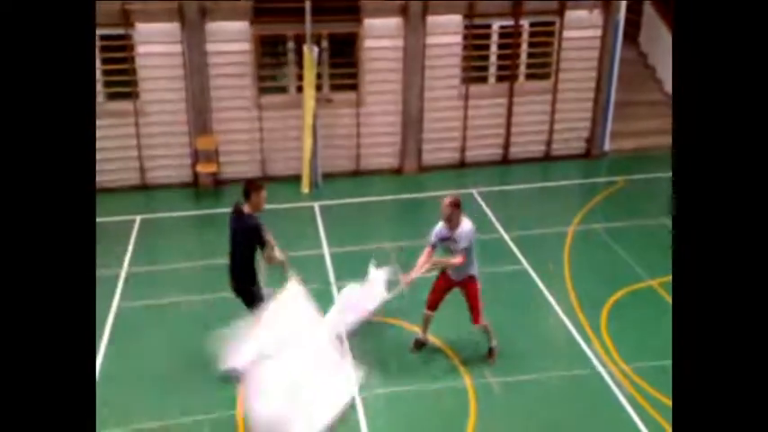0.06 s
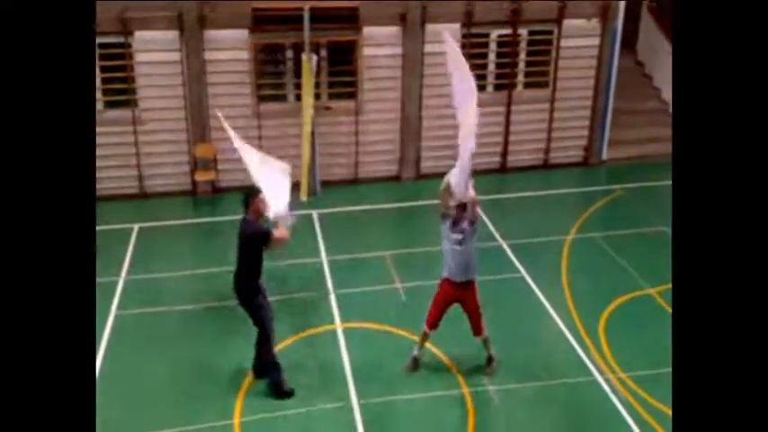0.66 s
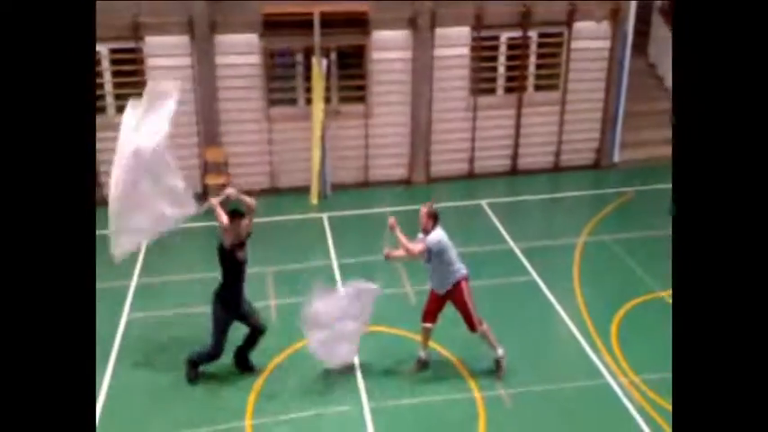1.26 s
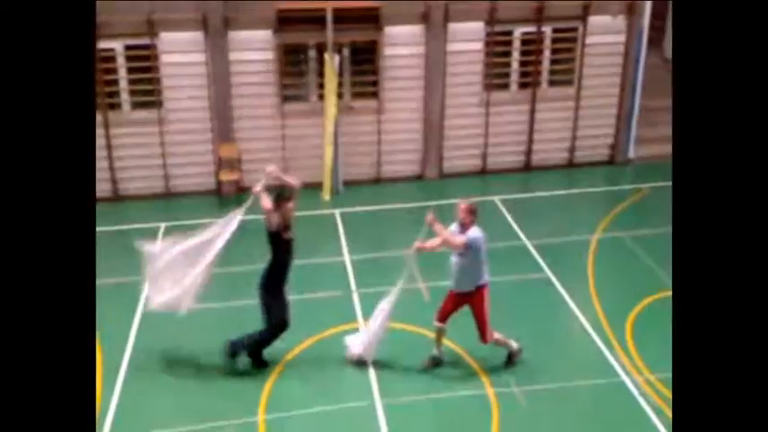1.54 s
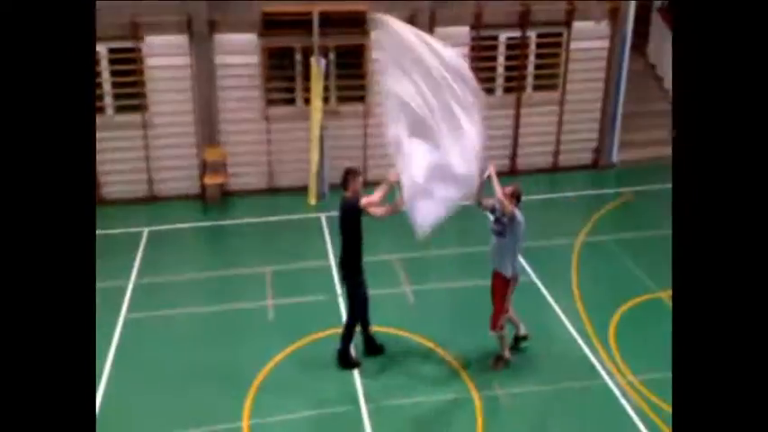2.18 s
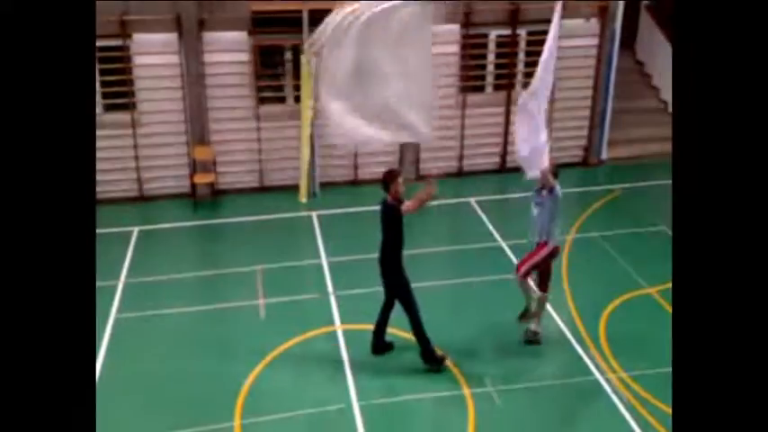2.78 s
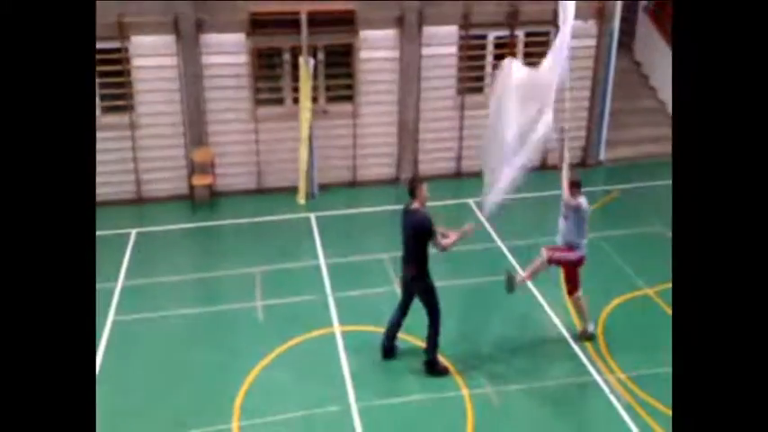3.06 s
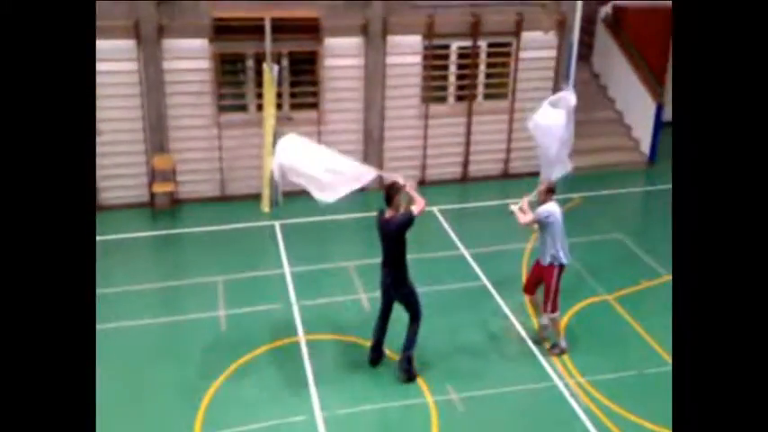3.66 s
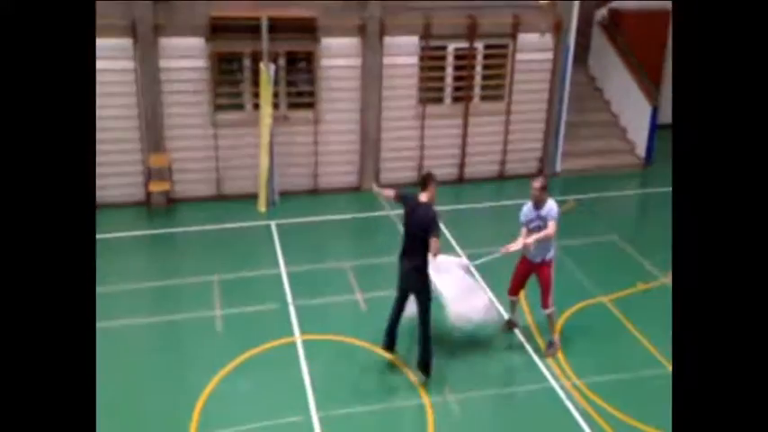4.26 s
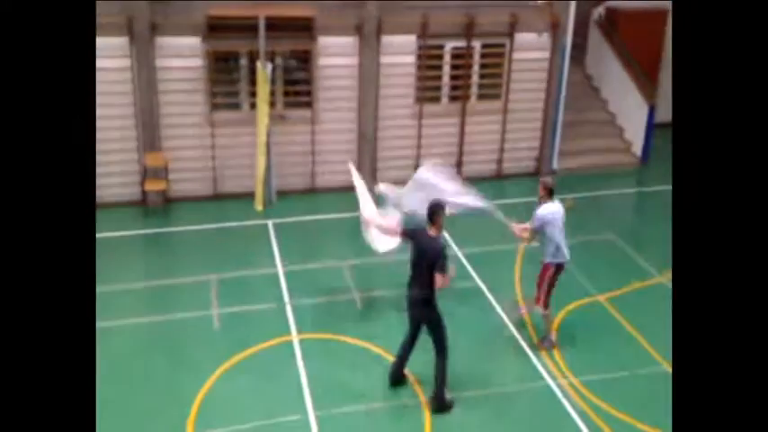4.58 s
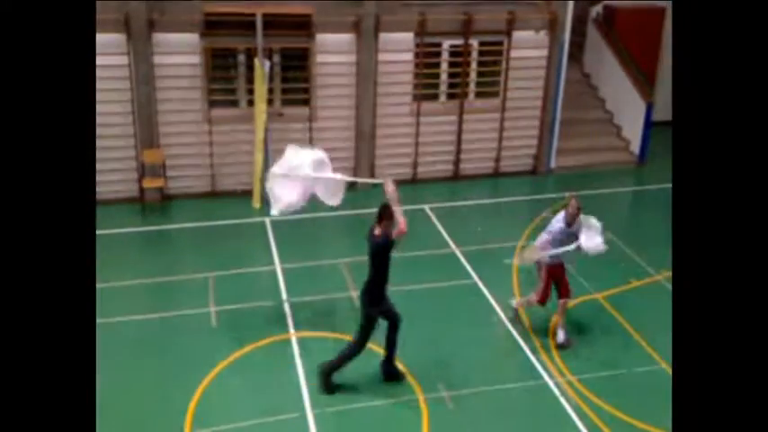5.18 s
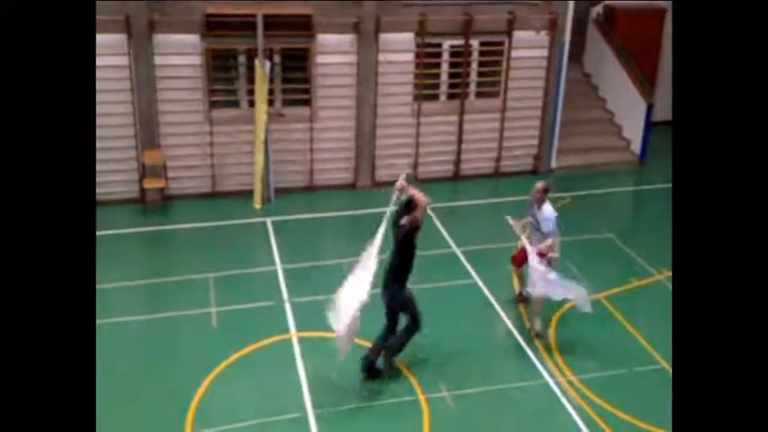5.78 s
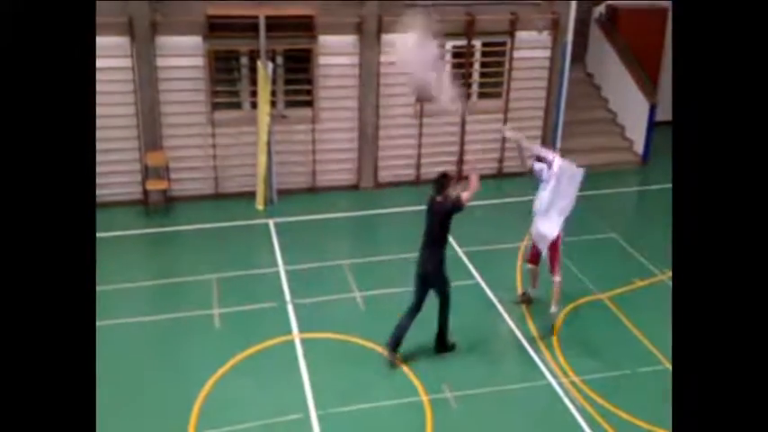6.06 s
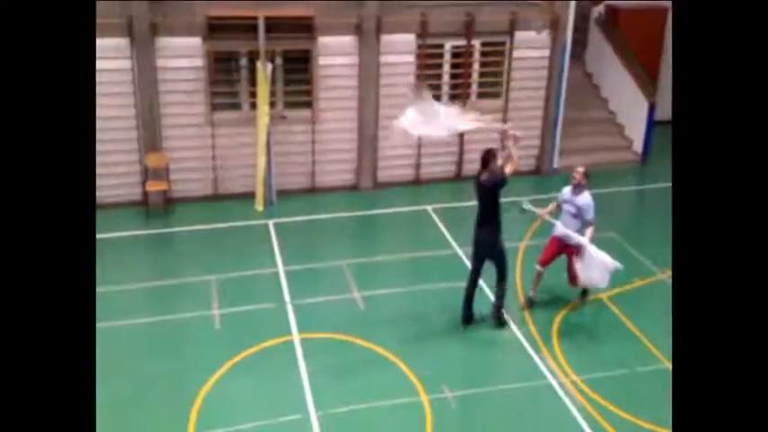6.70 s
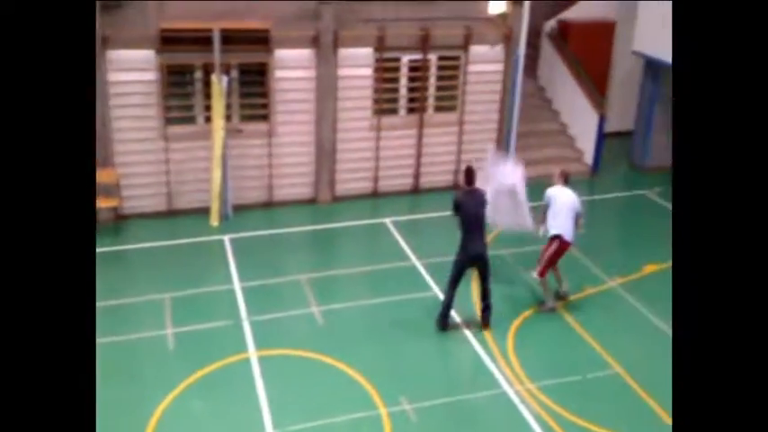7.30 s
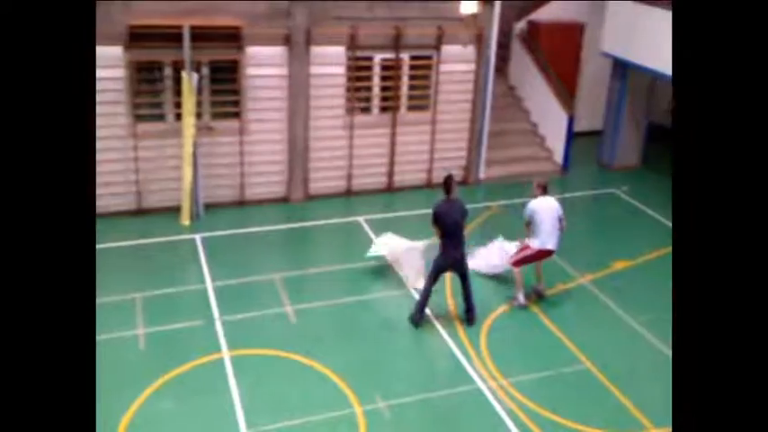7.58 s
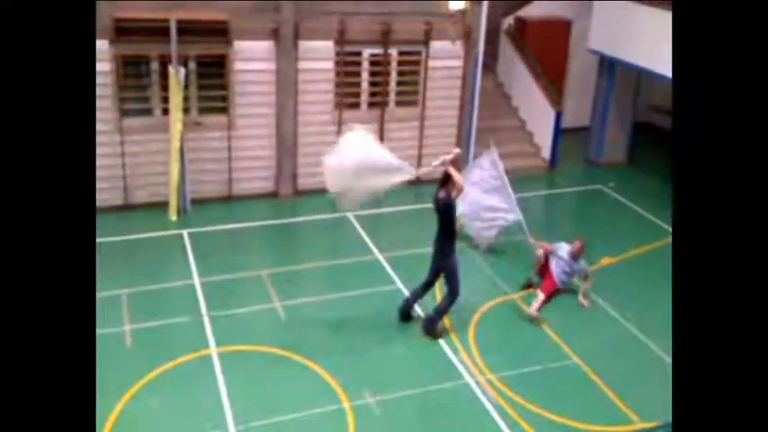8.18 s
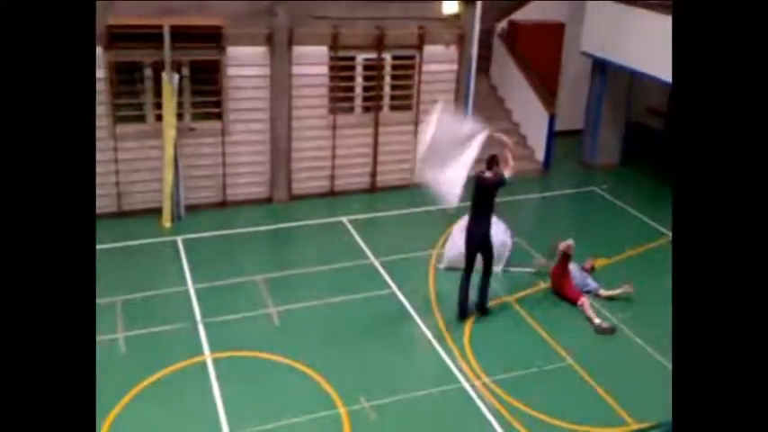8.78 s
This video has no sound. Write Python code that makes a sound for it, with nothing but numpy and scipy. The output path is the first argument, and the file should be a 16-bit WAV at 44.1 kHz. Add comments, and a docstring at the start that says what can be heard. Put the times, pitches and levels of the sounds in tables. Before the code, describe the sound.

Large cloth flags are swung in a sports hall, heard from a gallery, every snap echoing for up to two seconds over low air noise and faint hiss. A loud opening flurry of fluttering and flapping brings the sharpest whip-like crack at 0.3 seconds. Another swish comes at 1.2, then a dry, dull knock close to the microphone at 1.8. Strong flaps and a crack follow from 2 to 2.3, with lighter swishes and snaps around 3, 3.5 and 4.3. From about 4.8 to 6.1 there is a lull, holding a few soft pats of rubber soles and a faint close knock. At 6.2 a loud rustling swing with flaps and a crack breaks in. More swings and snaps come around 6.7, 7.3 and 8, then ease off, ending with a small snap and flutter near 9 seconds.

```python
"""In a sports hall, heard from a gallery, two people swing large cloth flags on poles.
Air flowing over the cloth makes it flutter and rustle; folds fill in dull flaps, and the free edge
cracks like a whip. A few dull knocks sound close by, and rubber soles pat the floor during a lull.
Floor and walls reflect each snap, and the hall reverberates for nearly two seconds, darkening as it
decays. Low air noise and a faint hiss lie underneath."""
import sys
import numpy as np
from scipy import signal
from scipy.fft import rfft, irfft
from scipy.io import wavfile
from scipy.ndimage import uniform_filter1d

SR = 44100
rng = np.random.default_rng(int(sys.argv[2]) if len(sys.argv) > 2 else 0)


def dump_mix(stems):
    """Bounce the given channels to the path in sys.argv[1] as a 16-bit WAV at rate SR."""
    frames = np.atleast_2d(stems).T  # one column per channel
    limited = np.clip(frames, -1, 1)  # hard clip at full scale
    pcm = np.round(limited * 32767).astype(np.int16)
    wavfile.write(sys.argv[1], SR, pcm)


N = 398771

# spectrum of the hall's air noise: (frequency [Hz], relative level [dB])
AIR_SPECTRUM = [(25, 3.5), (60, -2), (130, 2.5), (200, -8), (350, -1.5), (700, -8.5), (1200, -26.5),
                (3400, -28.5), (8000, -35), (15000, -37.5)]
# envelope of the faint hiss: (time [s], level [dB])
HISS_ENVELOPE = [(0, -57), (1.1, -69), (2.8, -76), (5.249, -90.5), (5.501, -77), (6.5, -62.5), (8.9, -76)]
# swings of a flag: (time at full speed [s], hold [s], flutter level [dB], final rustle level [dB])
SWINGS = [ (0.11, .17, -20.5, -40), (0.313, 0.041, -12.5, -8.5), (0.48, .1, -13, -22),
          (1.235, 0.12, -21, -39), (2.08, 0.171, -18, -19), (2.68, 0.41, -36.5, -52),
          (3.46, .08, -23.5, -37), (3.62, .21, -27.5, -52), (4.3, 0.12, -29.5, -33.5),
          (4.54, 0.16, -40.5, -62.5), (5.46, 0.057, -62, -57.5), (5.98, 0.21, -58.5, -58.5),
          (6.32, .12, -10, -10), (6.69, 0.17, -19.5, -40), (6.96, .17, -26.5, -49),
          (7.294, 0.028, -11.5, -20.5), (7.59, 0.12, -26, -40), (7.92, 0.171, -17.5, -22),
          (8.15, 0.14, -21.5, -35.5), (8.68, 0.062, -46, -46), (9.03, 0.028, -26, -51)]
# spectrum of fluttering cloth: (frequency [Hz], relative level [dB])
FLUTTER_SPECTRUM = [(25, -27.5), (60, -16), (130, -6.5), (180, -6), (290, 0.5), (600, 1.5), (850, 4.5),
                    (1000, -2.5), (1400, 0), (2100, -5.5), (3100, -16), (5000, -28), (8000, -43.5),
                    (15000, -57)]
# spectrum of rustling creases: (frequency [Hz], relative level [dB])
RUSTLE_SPECTRUM = [(300, -13), (1000, -4.5), (2200, 13), (4000, 2), (6500, -3), (8500, -8.5), (10500, -12),
                   (13000, -19.5), (15500, -23.5)]
# the loudest folds filling with air: (time [s], level [dB])
FLAPS = [ (0.054, -28), (0.2505, -7.5), (0.4934, -10), (1.154, -27.5), (1.181, -25), (1.26, -23.5),
         (2.003, -30), (2.061, -15), (2.094, -14.5), (2.273, -15.5), (3.367, -31.5), (3.4766, -17),
         (3.5155, -24), (6.234, -18), (6.266, -11), (6.301, -14), (6.341, -11.5), (6.69, -11),
         (7.0985, -13), (8.076, -11), (8.411, -23.5)]
# the loudest whip cracks: (time [s], level [dB], tilt [dB/octave], gain toward the listener [dB])
CRACKS = [ (0.2465, -26.5, -15, 16), (0.3119, -3, 0, 1.5), (0.339, -15.5, 9, -1.5), (0.492, -22, 2, 4.5),
          (1.26, -20, -11.5, 3), (1.409, -37, -9, 6.5), (2.0504, -33.5, -1.5, 2), (2.178, -12, -0.5, 0.5),
          (2.9555, -17, -16, 1.5), (2.977, -32.5, -13, 6.5), (3.4378, -35.5, -0.5, 1.5),
          (3.487, -35.5, 3, 0), (4.3545, -26, -4.5, 2), (6.4065, -13, -3, 3), (6.828, -43.5, 6, 2),
          (7.228, -14, -1, -4), (7.251, -23.5, -0.5, 6.5), (7.5866, -27.5, -4, -1.5),
          (7.86, -32.5, -3.5, -8), (7.987, -20.5, -12, 2.5), (8.076, -30, 8.5, 1),
          (8.9763, -28.5, -3.5, 1.5)]
# spectrum of a whip crack: (frequency [Hz], relative level [dB])
CRACK_SPECTRUM = [(100, -23), (500, -12.5), (1500, 2.5), (2500, 7), (4000, 5.5), (6500, 3.5), (8500, -3),
                  (10500, -11.5), (12500, -10), (14000, -14), (15500, -24.5)]
# dull knocks close by: (time [s], peak level [dB], frequency [Hz])
KNOCKS = [(1.814, -12, 450), (1.817, -21, 262), (5.719, -33.5, 279)]
# shoes landing on the floor: (time [s], level [dB])
FOOTSTEPS = [(5.205, -81), (5.26, -65.5), (5.52, -51), (5.895, -45), (6.048, -43.5), (6.145, -32.5)]
# spectrum of a sole's impact: (frequency [Hz], relative level [dB])
SOLE_SPECTRUM = [(60, -15.5), (150, -10.5), (350, -2), (600, 2), (900, -8), (1500, -15), (2500, -25.5),
                 (6000, -40), (15000, -65)]
# early reflections off floor and walls: (delay [s], level against the direct sound [dB])
REFLECTIONS = [(.0022, -30), (0.014, -23.5), (0.024, -12), (0.0278, -9.5), (0.04, -7)]
# reverberation time of the hall: (frequency [Hz], time to decay by 60 dB [s])
HALL_T60 = [(100, 2.9), (260, 2.03), (700, 1.407), (1840, 1.233), (3200, 1.14), (4850, 0.9), (8000, 0.5),
            (12800, 0.36)]

ATTACK_S, RELEASE_S = 0.042, 0.03  # the flag gathers speed, then falls slack
RUSTLE_RISE_DB = 19.5  # the rustle grows through a swing as the cloth pulls taut
FLAP_HZ = 897
SMALL_FLAPS_PER_S, SMALL_FLAP_DB = 22, -8  # level against the swing's flutter
TICKS_PER_S, TICK_DB = 16, -21  # level against the swing's flutter
TICK_TILT_DB, TICK_AIM_DB = -5, 6  # per octave; gain toward the listener
DIRECT_DB, HALL_DB, HALL_BUILD_S = -10, -5, 0.01955


def undb(db):
    """Amplitude grows tenfold for every 20 dB."""
    return 10 ** (np.asarray(db) / 20)


def unit(x):
    """Normalisation to an rms of one."""
    return x / np.sqrt(np.mean(x ** 2))


def along(points, hz):
    """Interpolation of (frequency [Hz], value) points on a logarithmic frequency axis."""
    f, value = np.transpose(points)
    return np.interp(np.log(np.maximum(hz, 1)), np.log(f), value)


def colour(x, spectrum, tilt_db=0, size=2048):
    """Minimum-phase filtering by a spectrum, tilted per octave about 3 kHz from 800 Hz upward."""
    hz = np.maximum(np.fft.rfftfreq(size, 1 / SR), 20)
    octaves = np.log2(np.maximum(hz, 800) / 3000)
    cepstrum = irfft(np.log(undb(along(spectrum, hz) + tilt_db * octaves)))
    cepstrum[1:size // 2] *= 2  # folding the cepstrum makes the filter causal
    cepstrum[size // 2 + 1:] = 0
    return signal.fftconvolve(x, irfft(np.exp(rfft(cepstrum))))[:len(x)]


def add(track, s, sound):
    """Superposition: a sound adds to the track from time s."""
    i = int(np.clip(s * SR, 0, N - 1))
    track[i:i + len(sound)] += sound[:N - i]


def burst(x, db):
    """Equal energy: a transient is scaled to match 25 ms of steady sound at this level."""
    return x * undb(db) * np.sqrt(.025 * SR / np.sum(x ** 2))


def pop(hz, cycles, size=2048):
    """A heavily damped pressure oscillation whose envelope peaks after the given cycles."""
    turns = hz * np.arange(size) / SR
    return np.sin(2 * np.pi * turns) * turns / cycles * np.exp(1 - turns / cycles)


def background(air_db=-65.5):
    """Background: the hall's steady, low air noise, and beneath it a faint white hiss of drifting level."""
    air = undb(air_db) * unit(colour(rng.standard_normal(N), AIR_SPECTRUM))
    hiss_db = np.interp(np.arange(N) / SR, *np.transpose(HISS_ENVELOPE))
    return air + undb(hiss_db) * rng.standard_normal(N)


def ripples(per_s, spread_db, rush_db):
    """Shot noise: random little slaps of cloth over the smooth rush of air, at constant mean power."""
    sizes = undb(spread_db * rng.uniform(-0.44, 1, N)) * rng.choice([-1, 1], N)
    slaps = (rng.random(N) < per_s / SR) * sizes
    noise = unit(slaps) + undb(rush_db) * rng.standard_normal(N)
    return noise / np.sqrt(uniform_filter1d(noise ** 2, size=900))


def swings(dulling_tilt=0.46, bright_above_db=-28):
    """Flow-induced flutter follows the flag's speed; rustle grows with tension and is duller when weak."""
    t, out = np.arange(N) / SR, np.zeros(N)
    flutter = unit(colour(ripples(per_s=200, spread_db=7.5, rush_db=-0.5), FLUTTER_SPECTRUM))
    creases = ripples(per_s=480, spread_db=7.5, rush_db=-2.0)
    for s, held, flutter_db, rustle_db in SWINGS:
        near = slice(*np.searchsorted(t, [s - 4 * ATTACK_S, s + held + 6 * RELEASE_S]))
        age = t[near] - s
        speed = np.exp(-.5 * (np.minimum(age, 0) / ATTACK_S) ** 2 - np.maximum(age - held, 0) / RELEASE_S)
        slack = np.clip(1 - age / held, 0, 1)
        tilt_db = dulling_tilt * min(rustle_db - bright_above_db, 0)
        rustle = unit(colour(creases[near], RUSTLE_SPECTRUM, tilt_db))
        cloth = np.roll(flutter, rng.integers(N))[near]  # every swing ripples in its own way
        out[near] += speed * (undb(flutter_db) * cloth + undb(rustle_db - RUSTLE_RISE_DB * slack) * rustle)
    return out


def during(start, length, per_s, scatter_db=3, count=16):
    """Quasi-periodic events of random strength within one swing: (time [s], relative level [dB])."""
    slip, strength = rng.random(count), rng.standard_normal(count)
    times = (np.arange(count) + slip) / per_s
    return np.transpose([start + times, scatter_db * strength])[times < length]


def small_flaps():
    """Travelling waves: lesser folds run down the cloth while a swing lasts, in rows like FLAPS."""
    return [(s, flutter_db + SMALL_FLAP_DB + db) for start, held, flutter_db, _ in SWINGS
            for s, db in during(start, held, SMALL_FLAPS_PER_S)]


def flaps(aimed_cycles=0.28, spread_cycles=0.27, shiver_db=-1, shiver_s=0.0011, aim_db=1.0, size=2048):
    """Impulsive radiation: a fold snaps taut and sends out a pulse; the listener also hears it shiver."""
    spread, aimed = np.zeros(N), np.zeros(N)
    lowpass = signal.butter(4, 2600, fs=SR)
    age = np.arange(size) / SR / shiver_s
    for s, db in list(FLAPS) + small_flaps():
        add(spread, s, burst(signal.lfilter(*lowpass, pop(FLAP_HZ, spread_cycles)), db))
        pulse = signal.lfilter(*lowpass, pop(FLAP_HZ, aimed_cycles))
        puff = rng.standard_normal(size) * age * np.exp(-age)
        shiver = signal.lfilter(*lowpass, colour(puff, FLUTTER_SPECTRUM))
        add(aimed, s, burst(burst(pulse, 0) + burst(shiver, shiver_db), db + aim_db))
    # acoustic short circuit: air slips round the cloth, so it radiates little bass
    return signal.lfilter(*signal.butter(1, 170, "high", fs=SR), [spread, aimed])


def ticks():
    """Whip action on a small scale: the hem ticks while a swing lasts, in rows like CRACKS."""
    return [(s, flutter_db + TICK_DB + db, TICK_TILT_DB, TICK_AIM_DB)
            for start, held, flutter_db, _ in SWINGS for s, db in during(start, held, TICKS_PER_S)]


def cracks(fade_s=0.005, shock_db=-8, aimed_tilt_db=-0.2, size=2048):
    """Whip action: the free edge flicks round, radiating a shock and a brief, directional tearing noise."""
    spread, aimed = np.zeros(N), np.zeros(N)
    fade = np.exp(-np.arange(size) / SR / fade_s)
    shock = signal.unit_impulse(size)
    for s, db, tilt_db, aim_db in list(CRACKS) + ticks():
        # summed over all directions, the crack has a smooth spectrum
        add(spread, s, burst(colour(shock, CRACK_SPECTRUM, tilt_db), db))
        whip = burst(rng.standard_normal(size) * fade, 0) + burst(shock, shock_db)
        add(aimed, s, burst(colour(whip, CRACK_SPECTRUM, tilt_db + aimed_tilt_db), db + aim_db))
    return np.array([spread, aimed])


def first_arrivals(x):
    """Specular reflection: delayed, weaker copies from floor and walls follow the direct sound."""
    out = x.copy()
    for delay, db in REFLECTIONS:
        add(out, delay, x * undb(db))
    return undb(DIRECT_DB) * out


def hall_response(size=1024):
    """A diffuse field builds up, then decays exponentially by absorption, the treble first."""
    hz, s, cells = signal.stft(rng.standard_normal(2 * SR), SR, nperseg=size)
    cells = cells * np.exp(-np.log(1000) * s / along(HALL_T60, hz)[:, None])
    tail = signal.istft(cells, SR, nperseg=size)[1]
    build = 1 - np.exp(-np.arange(len(tail)) / SR / HALL_BUILD_S)
    return undb(HALL_DB) * tail * build / np.sqrt(SR / 10)


def reverberation(x, hop=2000, count=16):
    """Moving sources change their echo paths, so successive stretches of sound take turns among responses."""
    out = np.zeros(N)
    window = signal.get_window("hann", 2 * hop) ** .5
    padded = np.pad(x, (hop, 2 * hop))
    responses = [hall_response() for _ in range(count)]
    for k, start in enumerate(range(0, N + hop, hop)):
        wet = signal.fftconvolve(padded[start:start + 2 * hop] * window, responses[k % count])
        add(out, max(start - hop, 0) / SR, wet[max(hop - start, 0):])
    return out


def knocks(cycles=0.21):
    """Direct field alone: damped bumps, close by and too weak to excite the hall."""
    out = np.zeros(N)
    for s, db, hz in KNOCKS:
        add(out, s, undb(db) * pop(hz, cycles))
    return out


def footsteps(fade_s=0.0082, size=2048):
    """Impact noise: soft rubber soles pat the floor, exciting little treble."""
    out = np.zeros(N)
    fade = np.exp(-np.arange(size) / SR / fade_s)
    for s, db in FOOTSTEPS:
        add(out, s, burst(colour(rng.standard_normal(size) * fade, SOLE_SPECTRUM), db))
    return out


def scene():
    """Direct and diffuse fields: sound aimed at the listener arrives first, the rest as reverberation."""
    spread, aimed = swings() + footsteps() + flaps() + cracks()
    return (first_arrivals(aimed) + reverberation(spread) + knocks() + background())[None]


def record(dry, top_hz=15700):
    """Saturation: the hardest crack overloads the microphone; a steep low-pass limits the bandwidth."""
    clipped = dry / (1 + dry ** 6) ** (1 / 6)
    return signal.sosfilt(signal.ellip(10, .2, 70, top_hz, fs=SR, output="sos"), clipped)


dry = scene()
out = record(dry)
dump_mix(out)
```